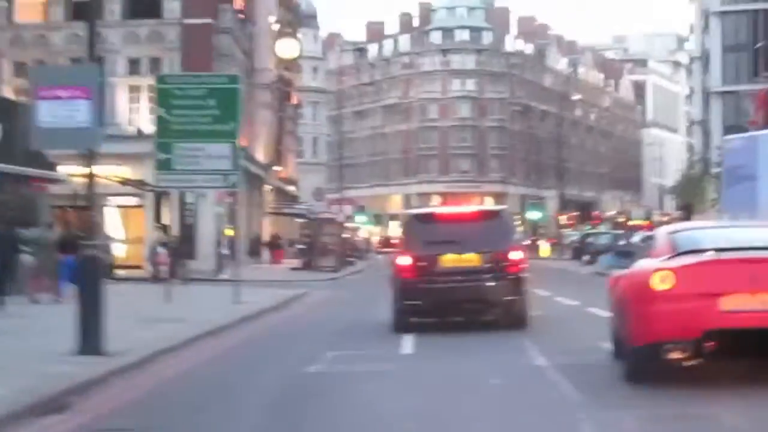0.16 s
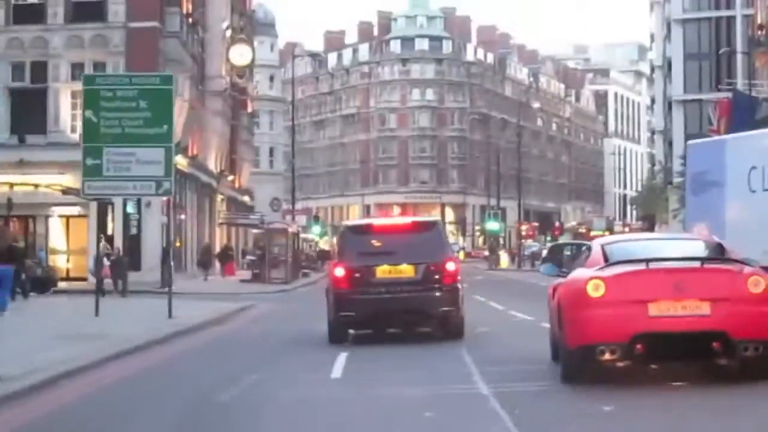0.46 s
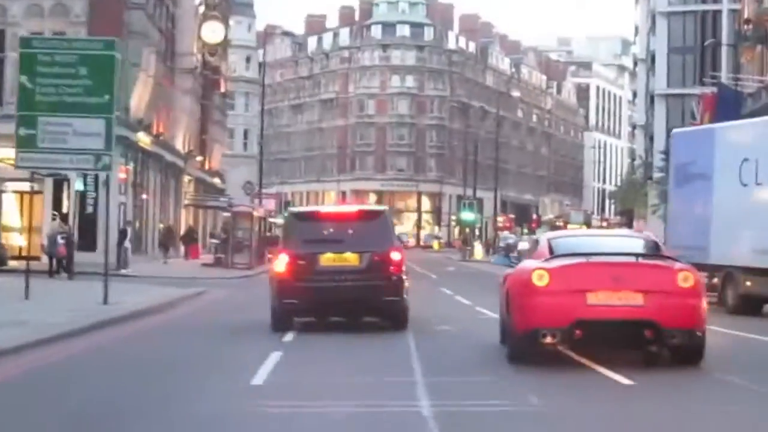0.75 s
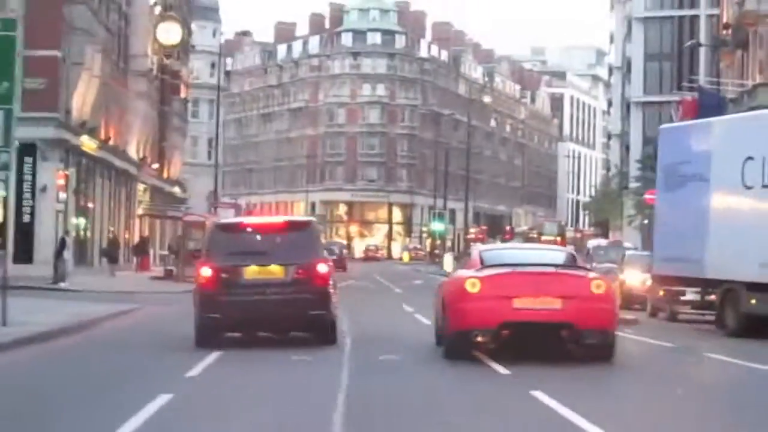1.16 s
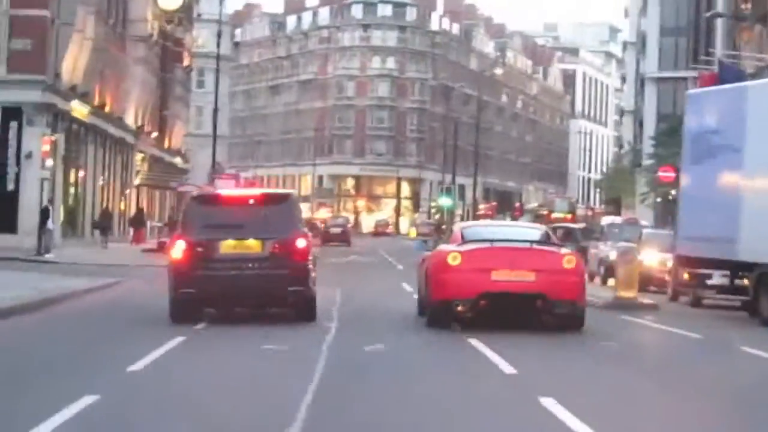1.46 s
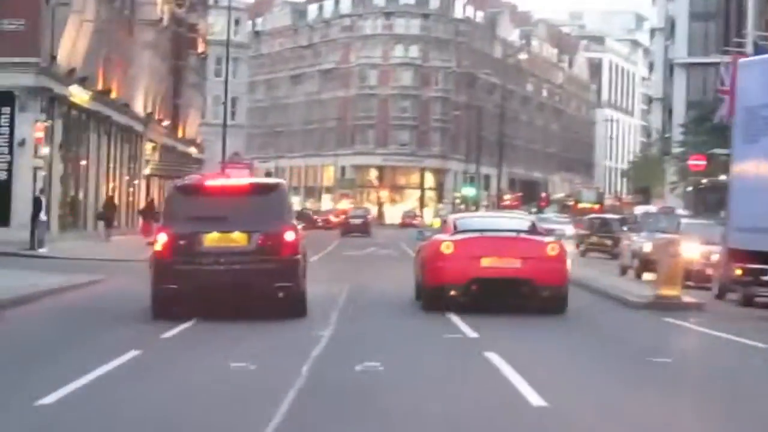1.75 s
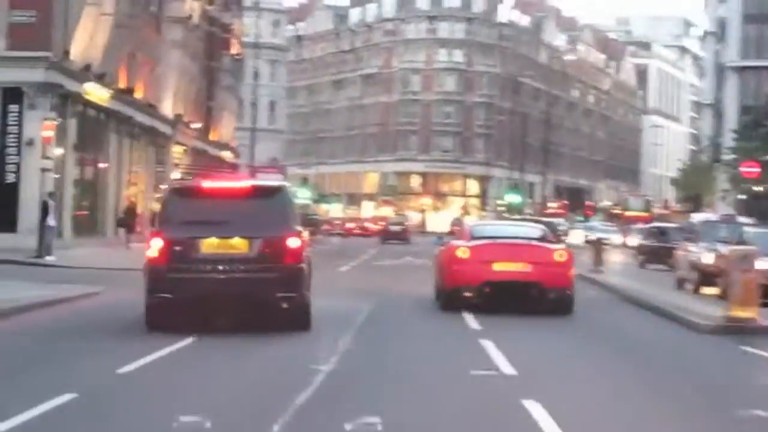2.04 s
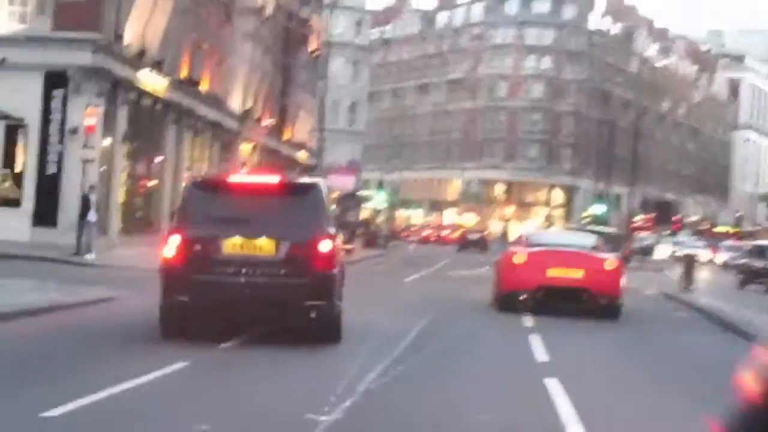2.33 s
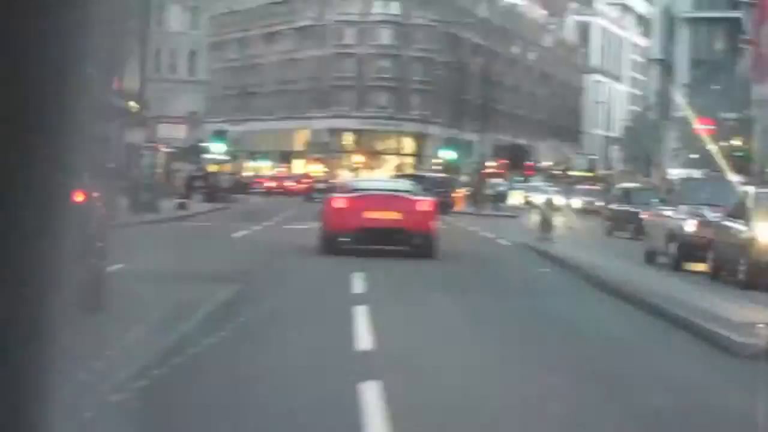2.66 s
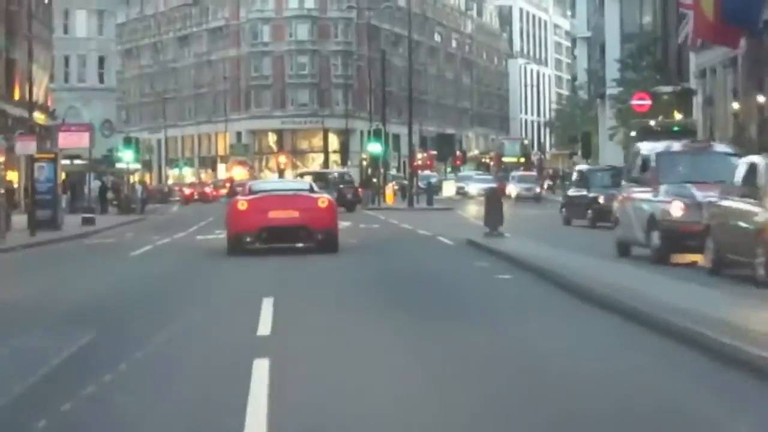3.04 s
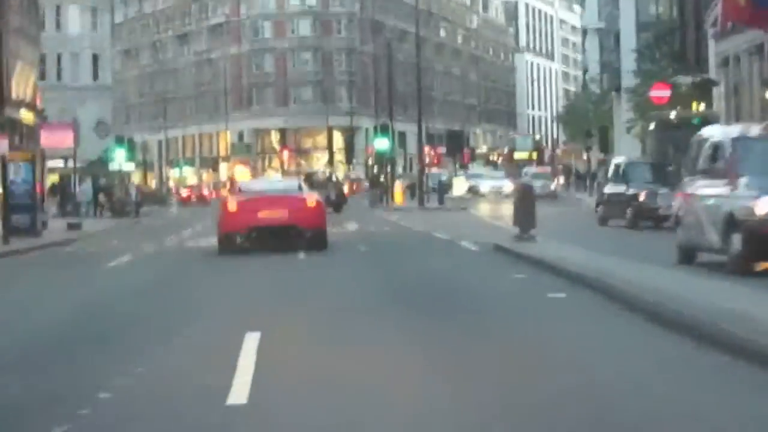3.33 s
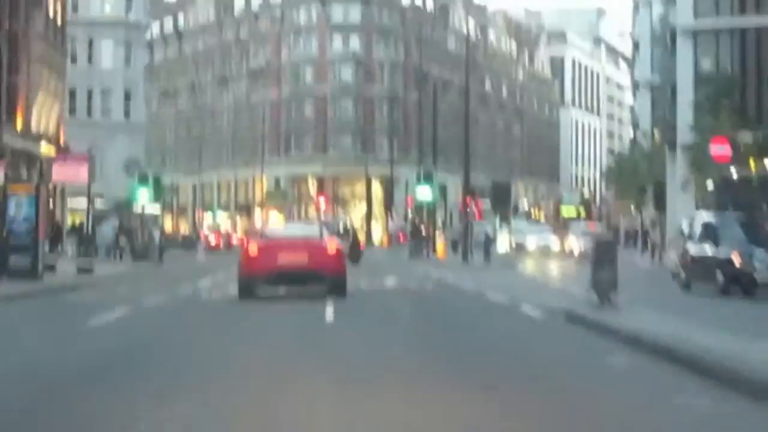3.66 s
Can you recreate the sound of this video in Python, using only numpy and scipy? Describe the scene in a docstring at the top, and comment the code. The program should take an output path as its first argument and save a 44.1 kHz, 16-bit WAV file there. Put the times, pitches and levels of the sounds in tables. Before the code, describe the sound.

A sports car's exhaust howls, climbing smoothly from 0.3 to about 2.2 s, with raspy, crackling surges near 0.8 and 2 s. A brief deep drone and wind rumble open; bass wind swells again to 1.5 s, then fluttering wind and hard, distorted buffets strike until 2.5 s. Dry knocks follow, the wind cuts off, the howl sinks away, and a muffled cabin hum falls in pitch while growing until 3.8 s.

```python
"""A V12 sports car howls away hard along a city street while wind buffets and overloads the microphone.
It is heard from the window of a car that follows; its exhaust climbs in pitch and rasps under load.
At 2.55 s the microphone is drawn inside: the wind stops, the howl fades and the cabin hums.
Exhaust and hum are sums of engine orders, cracks are filtered pulses, wind and gas are coloured noise."""
import sys
import numpy as np
from scipy import signal
from scipy.fft import rfft, irfft
from scipy.io import wavfile

SR = 44100
rng = np.random.default_rng(int(sys.argv[2]) if len(sys.argv) > 2 else 0)


def generate_wav(sig):
    """Save sig (samples, or channels by samples) to the path in sys.argv[1] as 16-bit PCM at SR."""
    pcm = np.round(np.clip(np.atleast_2d(sig).T, -1, 1) * 32767).astype(np.int16)
    wavfile.write(sys.argv[1], SR, pcm)


N = 167580  # 3.8 s
T = np.arange(N) / SR
BINS_HZ = np.arange(N // 2 + 1) * SR / N

# faint hiss of the microphone: level, then colour: (frequency [Hz], gain [dB])
MIC_HISS_DB = -70.5
MIC_HISS_COLOUR = [(4000, -3), (7500, 2.5), (10000, -5), (13000, -28)]

# road noise inside the following car: (time [s], level [dB])
CABIN_LEVEL = [(2.5, -65), (2.8, -60.5), (3.15, -49), (3.5, -44), (3.8, -42.5)]
# its colour: (frequency [Hz], gain [dB])
CABIN_COLOUR = [(20, -6), (60, -15.5), (120, 0), (200, -3.5), (380, 3), (600, -7), (900, -1), (1500, -16),
                (10000, -73.5)]
# engine of the following car: (time [s], fundamental [Hz], level [dB])
HUM = [(2.55, 146.5, -74), (2.8, 142.4, -54), (3.05, 138.4, -46.5), (3.2, 138.2, -50.5),
       (3.35, 136.5, -43.5), (3.6, 130.6, -41), (3.8, 121.9, -37)]
# its orders: (multiple of the fundamental, level [dB])
HUM_ORDERS = [(1, -2), (2, -10), (2.75, -15.5), (3, -5), (3.7, -7.5), (6, -12)]

# bass rumble of the wind: (time [s], level [dB])
RUMBLE_LEVEL = [(0, -17), (.1, -10), (.18, -21.5), (.23, -45), (.3, -62), (.47, -41.5), (.8, -29),
                (1.1, -22.5), (1.42, -16.5), (1.51, -30), (1.57, -49.5), (2.5, -54), (2.6, -85)]
# its colour: (frequency [Hz], gain [dB])
RUMBLE_COLOUR = [(20, -31.5), (50, -11), (100, -4), (170, 0.5), (300, 0), (600, -9), (3000, -87.5)]
# flutter of the wind: (time [s], level [dB])
FLUTTER_LEVEL = [(0, -21), (.1, -27), (.2, -33), (.5, -35.5), (1.0, -30.5), (1.38, -25), (1.55, -21.5),
                 (1.8, -21.5), (2.1, -22.5), (2.3, -24), (2.42, -22), (2.53, -23), (2.6, -54), (2.8, -89)]
# its colour: (frequency [Hz], gain [dB])
FLUTTER_COLOUR = [(30, -33), (80, -27.5), (140, -15), (250, 3.5), (450, 4.5), (800, 4.5), (1400, -5),
                  (2800, -27.5), (4000, -37.5), (12000, -63.5)]
# part of the wind common to both ports: (frequency [Hz], gain [dB])
WIND_SHARED = [(100, -13.5), (220, -10.5), (450, -6.5), (1000, -4.5), (3000, -2)]
FLUTTER_FLICKER_DB, FLUTTER_LEFT_DB = 2, 2.5

# sharp buffets, before BUFFET_GAIN: (time [s], length [s], left level [dB], right level [dB])
BUFFETS = [(1.496, 0.0086, -14, -26), (1.604, 0.011, -14.5, -27), (1.738, .016, -13, -21),
           (1.763, 0.0066, -10.5, -24), (2.192, 0.0067, -6, -12), (2.356, 0.0049, -10.5, -27),
           (2.379, 0.037, -15.5, -14.5), (2.406, 0.017, -11, -14.5), (2.422, 0.0058, -7, -14),
           (2.51, 0.0094, -13, -17.5)]
# their colour: (frequency [Hz], gain [dB])
BUFFET_COLOUR = [(30, -29), (150, -14), (400, 0), (900, 10), (1500, 2.5), (2800, -7), (4000, -22),
                 (6000, -25.5), (10000, -42.5), (16000, -63)]
BUFFET_GAIN = 0.78
# blunt gusts that overload a port: (time [s], left level [dB], right level [dB])
SLAPS = [(1.7362, -1, -18), (2.19, -6, -24), (2.3777, -35, -2.5), (2.41, -11, -35)]
SLAP_HZ, SLAP_S = 883.6, 0.00067

# the microphone knocks on its way in: (time [s], left level [dB], right level [dB])
KNOCKS = [(2.5036, -11, -31), (2.5114, -21, -30)]
# their colour: (frequency [Hz], gain [dB])
KNOCK_COLOUR = [(40, -35), (300, -16), (1500, 11), (3800, -6), (5500, -1), (15000, -39)]
KNOCK_DECAY_S = 0.0033

# engine speed of the sports car: (time [s], fundamental [Hz])
REVS = [(0, 88.9), (.22, 94), (.38, 101.7), (.89, 117.1), (1.25, 128.6), (1.66, 139.8), (1.92, 146),
        (2.14, 151.3), (2.28, 150.6), (2.44, 151.7), (2.57, 150.6), (2.75, 145.9), (3.8, 130.2)]
WOBBLE = 0.00079  # spread of the engine speed, as a fraction
FADE_DB = 2.5  # slow fading of every order
ROUGH, BLARE_ROUGH, HUM_ROUGH = 0.14, 0.27, 0.18  # fast flutter of an order, as a fraction
TONE_SPREAD, BOOM_SPREAD, RASP_SPREAD = 0.26, 0.39, 0.32  # part opposed between the channels
LEFT_DB = 2  # engines, exhaust and cabin are louder on the left

# deep engine drone at the opening: (multiple of the fundamental, level [dB])
DRONE_ORDERS = [(2, -4), (3.3, -13.5), (4, 0.5), (5.2, -17), (6, -8), (7, -14), (8, -13), (9, -12)]
# its course: (time [s], level [dB])
DRONE_LEVEL = [(0, -18), (.07, -11), (.11, -27), (.17, -25.5), (.21, -59), (.3, -84)]

# gas rasp, before the trims below: (time [s], body level [dB], treble level [dB])
RASP_LEVEL = [(0, -37, -50.5), (.24, -42, -54.5), (.45, -35, -50), (.68, -30.5, -43), (.79, -26, -33.5),
              (.87, -30, -41.5), (1.03, -29.5, -43), (1.2, -33.5, -47), (1.36, -31, -45.5),
              (1.55, -33.5, -48), (1.8, -32, -46.5), (1.96, -23.5, -30.5), (2.2, -26, -33.5),
              (2.33, -28, -38), (2.55, -29, -43), (2.74, -41, -60.5), (2.95, -48, -67), (3.8, -55, -66.5)]
# colour of its body: (frequency [Hz], gain [dB])
RASP_COLOUR = [(200, -45), (400, -13.5), (750, 2), (1100, 0), (1500, -5), (2000, -7), (2800, -10),
               (3400, -17.5), (4000, -30), (9000, -83.5)]
# colour of its treble: (frequency [Hz], gain [dB])
HISS_COLOUR = [(2500, -28), (3800, -2.5), (4700, 5), (5600, 1.5), (7000, -4), (8500, -12), (10500, -22),
               (13000, -42), (16000, -58.5)]
RASP_TRIM_DB, HISS_TRIM_DB, SPUTTER_DB = 2, -4.5, 0.83
RASP_PULSING, HISS_PULSING = 0.28, 0.18  # depth of the puffs

# cylinder banks: (place in the cycle [0-1], level [dB])
BANKS = [(0, -3), (0.431, -5.5)]
# colour of their cracks: (frequency [Hz], gain [dB])
CRACK_COLOUR = [(600, -19.5), (1700, 5.5), (3900, -4.5), (6000, -5.5), (14000, -43)]
CRACK_TRIM_DB, CRACK_SCATTER_DB = -4.5, 4.5

# exhaust orders other than the howl: (multiple of the fundamental, level [dB])
ORDERS = [(2, -4), (3, -1), (4, 0), (6, -8), (8, -2.5), (9, -3), (10, -8), (11, -10), (12, -6.5),
          (13, -18.5), (14, -16.5), (15, -15), (16, -21.5), (17, -16.5), (19, -17)]
# tailpipe resonances: (frequency [Hz], gain [dB])
PIPE = [(180, -13), (230, 7), (300, -12), (370, 2), (440, -7), (510, -1.5), (600, -7), (700, -9),
        (790, 4.5), (880, -8), (970, 1.5), (1100, -6.5), (1800, -0.5)]
# low orders, 2 to 4: (time [s], level [dB])
BOOM_LEVEL = [(0, -25.5), (.35, -54.5), (.6, -33), (.85, -32), (1.05, -27.5), (1.27, -21.5), (1.55, -32),
              (2.15, -20.5), (2.5, -28.5), (2.8, -41), (3.1, -69)]
# high orders, 6 and from 8 up: (time [s], level [dB])
BLARE_LEVEL = [(0, -44), (.2, -36.5), (.5, -27.5), (.81, -21), (.9, -27), (1.05, -24), (1.3, -41),
               (1.8, -36), (2.0, -23.5), (2.25, -27), (2.45, -40), (2.65, -37), (3.0, -57)]
# howl: (time [s], fifth order level [dB], seventh order level [dB])
HOWL_LEVEL = [(0, -61.5, -31), (.35, -27.5, -48), (.6, -32.5, -24), (.8, -33.5, -25), (.98, -33.5, -21),
              (1.25, -31, -32.5), (1.45, -26.5, -38), (1.68, -26, -25.5), (1.84, -24.5, -27),
              (2.0, -19, -23), (2.2, -23.5, -18), (2.42, -29, -30.5), (2.57, -34.5, -27.5),
              (2.85, -47.5, -52), (3.3, -59.5, -56)]

TOP_HZ = 15800  # upper limit of the microphone signal


def undb(db):
    """Decibels to gain."""
    return 10 ** (np.asarray(db) / 20)


def curve(rows, axis=1):
    """One column of a table, joined by straight lines in time."""
    rows = np.array(rows, float)
    return np.interp(T, rows[:, 0], rows[:, axis])


def response(points, hz):
    """Gain of a (frequency [Hz], gain [dB]) outline at the given frequencies."""
    points = np.array(points, float)
    return undb(np.interp(np.log(hz + 1e-9), np.log(points[:, 0]), points[:, 1]))


def coloured(x, points):
    """A signal filtered by a frequency outline."""
    return irfft(rfft(x) * response(points, BINS_HZ), N)


def noise(points):
    """Noise of rms 1 with the given colour."""
    x = coloured(rng.standard_normal(N), points)
    return x / x.std()


def opposed(x):
    """The same signal in both channels, with opposite signs."""
    return x * np.array([[1], [-1]])


def pair(points, mid, side):
    """Two channels of noise from a shared part and an opposed part."""
    return mid * noise(points) + side * opposed(noise(points))


def walk(rate):
    """Smooth random drift of spread 1 that changes about rate times a second."""
    x = irfft(rfft(rng.standard_normal(N)) / (1 + (BINS_HZ / rate) ** 4), N)
    return (x - x.mean()) / x.std()


def lean(db):
    """Channel gains for a source that is db louder on the left."""
    return undb(np.array([[db], [-db]]) / 2)


def sides(left_db, right_db):
    """Channel gains from a level for each side."""
    return undb([[left_db], [right_db]])


def turns(hz):
    """Running phase of a slightly unsteady shaft."""
    return 2 * np.pi * np.cumsum(hz * (1 + WOBBLE * walk(10.9))) / SR


def partial(phase, rough, spread):
    """One order: uneven firings roughen it, house fronts make it fade and differ between the ears."""
    direct = undb(FADE_DB * walk(5) - 1) * (1 + rough * (walk(45) + 1j * walk(45)))
    echo = spread * opposed(walk(5) + 1j * walk(5)) / np.sqrt(2)
    start = 2 * np.pi * rng.random()
    return np.sqrt(2) * np.real((direct + echo) * np.exp(1j * (phase + start)))


def microphone_hiss():
    """Steady faint noise of the microphone itself."""
    return undb(MIC_HISS_DB) * pair(MIC_HISS_COLOUR, 0.87, 0.5)


def cabin():
    """Inside the following car: its engine note sinks over the road noise."""
    phase = turns(curve(HUM))
    hum = sum(undb(db) * partial(k * phase, HUM_ROUGH, 0.22) for k, db in HUM_ORDERS)
    road = undb(curve(CABIN_LEVEL) + 1.4 * walk(11)) * pair(CABIN_COLOUR, 1, 0.3)
    return undb(curve(HUM, axis=2)) * hum + road


def eddies(points):
    """Wind noise on two ports: opposed in the bass, nearly unrelated higher up."""
    shared = coloured(noise(points), WIND_SHARED)
    return shared + opposed(noise(points))


def wind():
    """Bass rumble and flutter of the airstream on the microphone."""
    rumble = undb(curve(RUMBLE_LEVEL) + 2 * walk(33)) * eddies(RUMBLE_COLOUR)
    flutter = undb(curve(FLUTTER_LEVEL) + FLUTTER_FLICKER_DB * walk(45)) * eddies(FLUTTER_COLOUR)
    return rumble + flutter * lean(FLUTTER_LEFT_DB)


def buffets():
    """Short hard gusts strike each port separately: bell-shaped swells of wind noise."""
    swell = np.zeros((2, N))
    for at, length, left, right in BUFFETS:
        swell += sides(left, right) * np.exp(-2 * ((T - at) / length) ** 2)
    return swell * eddies(BUFFET_COLOUR) * BUFFET_GAIN


def slaps():
    """Blunt gusts push a port one way and back: a sine within a very short bell."""
    out = np.zeros((2, N))
    for at, left, right in SLAPS:
        bell = np.exp(-((T - at) / SLAP_S) ** 2)
        out += sides(left, right) * bell * np.sin(2 * np.pi * SLAP_HZ * (T - at))
    return out


def knocks():
    """Dry, bright knocks on the microphone's housing: noise that dies away at once."""
    fall = np.zeros((2, N))
    for at, left, right in KNOCKS:
        fall += sides(left, right) * (T >= at) * np.exp(-np.abs(T - at) / KNOCK_DECAY_S)
    return fall * pair(KNOCK_COLOUR, 0.69, 0.46)


def drone(phase):
    """A deep engine drone, strongest at the second and fourth multiples, which dies away within 0.3 s."""
    tones = sum(undb(db) * partial(k * phase, ROUGH, TONE_SPREAD) for k, db in DRONE_ORDERS)
    return undb(curve(DRONE_LEVEL)) * tones


def rasp(phase):
    """Hot gas tears out of the pipes in puffs, once a cycle, with a sputter over body and treble."""
    beat = np.cos(phase + 1.38 * walk(40))
    sputter = undb(SPUTTER_DB * walk(60))
    body = undb(curve(RASP_LEVEL) + RASP_TRIM_DB) * pair(RASP_COLOUR, 1, RASP_SPREAD)
    hiss = undb(curve(RASP_LEVEL, axis=2) + HISS_TRIM_DB) * pair(HISS_COLOUR, 0.64, 0.4)
    return (body * (1 + RASP_PULSING * beat) + hiss * (1 + HISS_PULSING * beat)) * sputter


def cracks(phase):
    """Under load each bank's pressure front steepens into a sharp crack, once a cycle."""
    train = np.zeros(N)
    for place, db in BANKS:
        at = np.flatnonzero(np.diff(np.floor(phase / (2 * np.pi) - place)))
        train[at] += undb(db + CRACK_SCATTER_DB * rng.standard_normal(len(at)))
    x = coloured(train, CRACK_COLOUR)
    # the cracks follow the treble of the rasp
    return undb(curve(RASP_LEVEL, axis=2) + CRACK_TRIM_DB) * x / x.std()


def exhaust(hz, phase):
    """Two clean orders howl; the others sweep up through the tailpipe resonances, the high ones rough."""
    boom, blare = undb(curve(BOOM_LEVEL)), undb(curve(BLARE_LEVEL))
    out = undb(curve(HOWL_LEVEL)) * partial(5 * phase, ROUGH, TONE_SPREAD)
    out = out + undb(curve(HOWL_LEVEL, axis=2)) * partial(7 * phase, ROUGH, TONE_SPREAD)
    for k, db in ORDERS:
        if k < 5:
            order = boom * partial(k * phase, ROUGH, BOOM_SPREAD)
        else:
            order = blare * partial(k * phase, BLARE_ROUGH, TONE_SPREAD)
        out = out + undb(db) * response(PIPE, k * hz) * order
    return out


def scene():
    """Microphone hiss, wind and knocks, with the cabin, the drone and the sports car to the left."""
    hz = curve(REVS)
    phase = turns(hz)
    at_microphone = microphone_hiss() + wind() + buffets() + slaps() + knocks()
    sports_car = rasp(phase) + cracks(phase) + exhaust(hz, phase)
    return at_microphone + (cabin() + drone(phase) + sports_car) * lean(LEFT_DB)


def record(dry):
    """The hardest gusts are rounded off at full scale; a steep low-pass cuts the top."""
    rounded = dry / (1 + dry ** 8) ** (1 / 8)
    low_pass = signal.ellip(8, 0.2, 70, TOP_HZ, fs=SR, output="sos")
    return signal.sosfilt(low_pass, rounded)


dry = scene()
out = record(dry)
generate_wav(out)
```